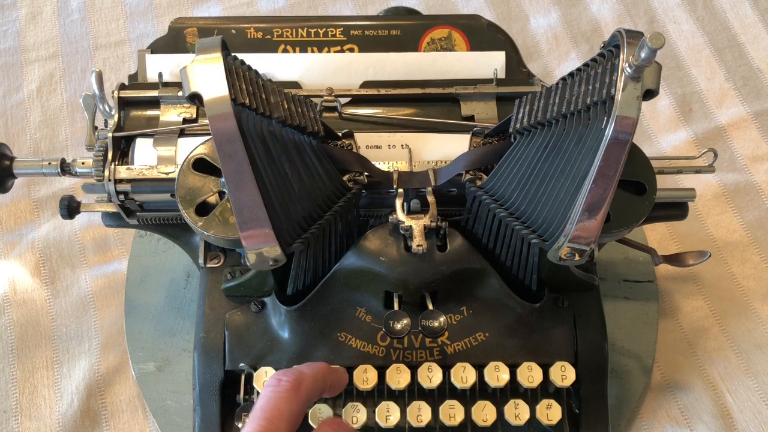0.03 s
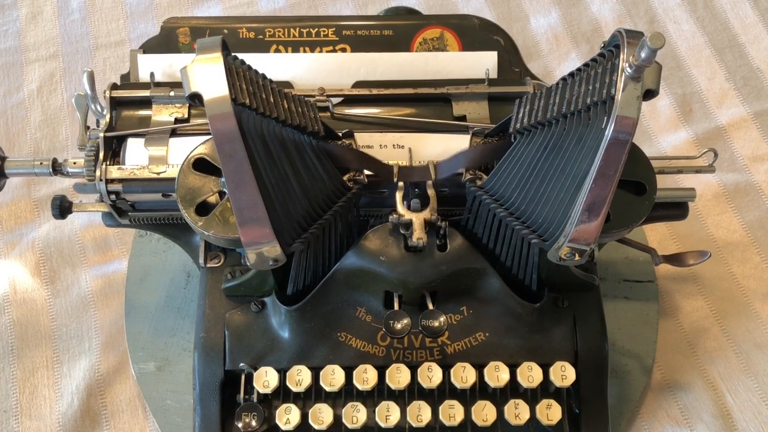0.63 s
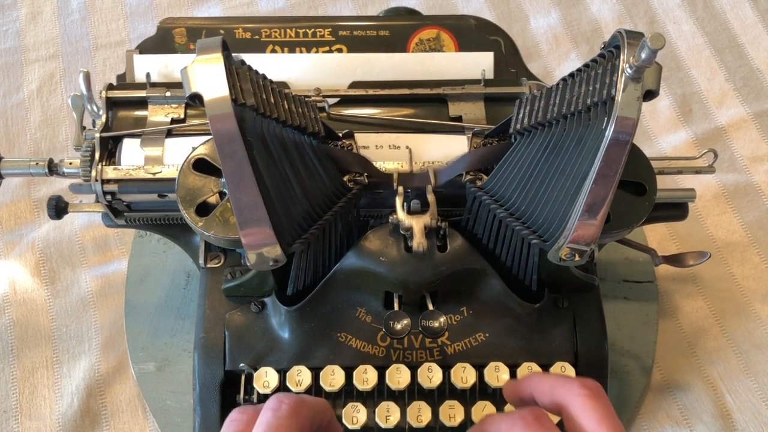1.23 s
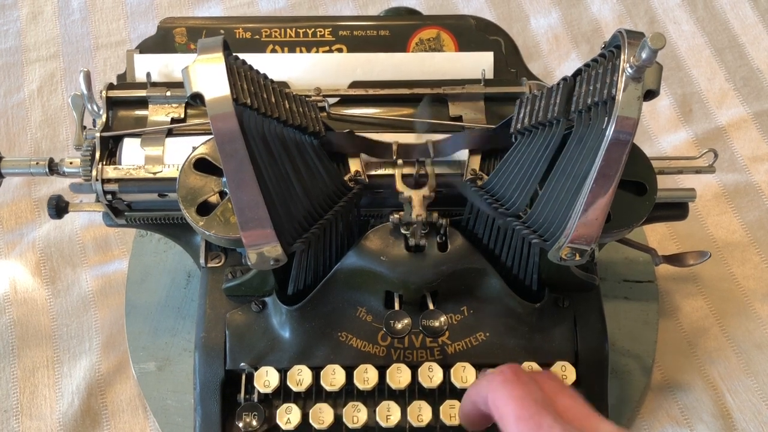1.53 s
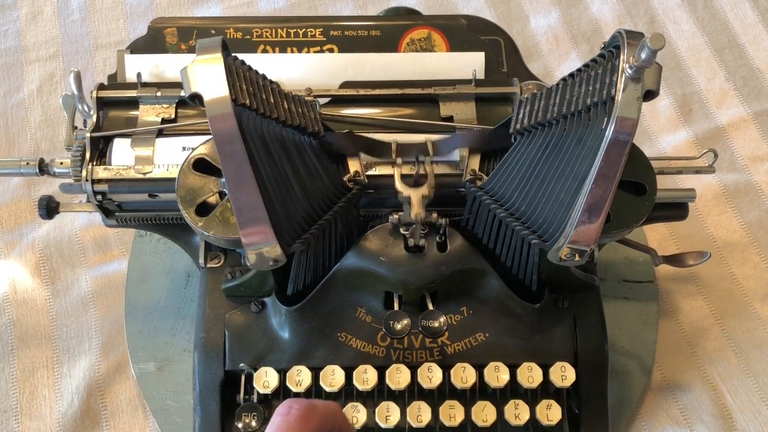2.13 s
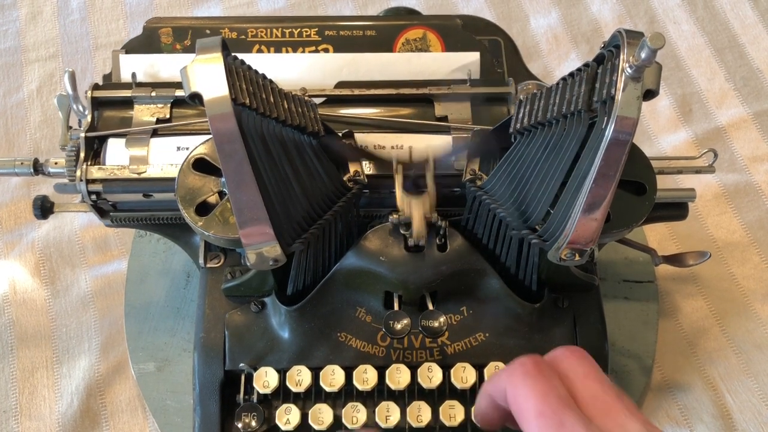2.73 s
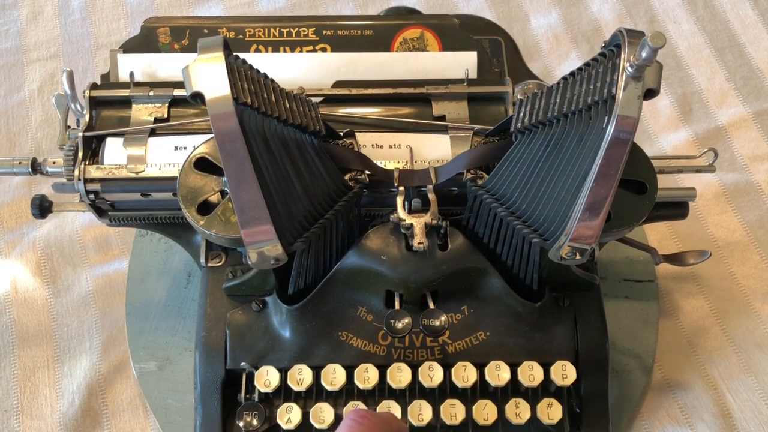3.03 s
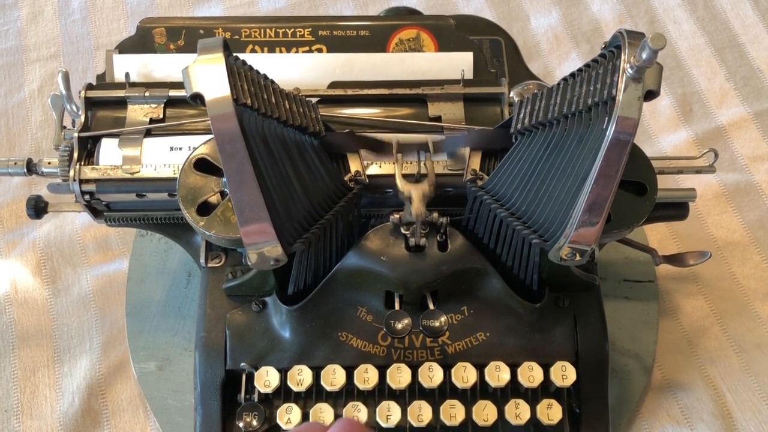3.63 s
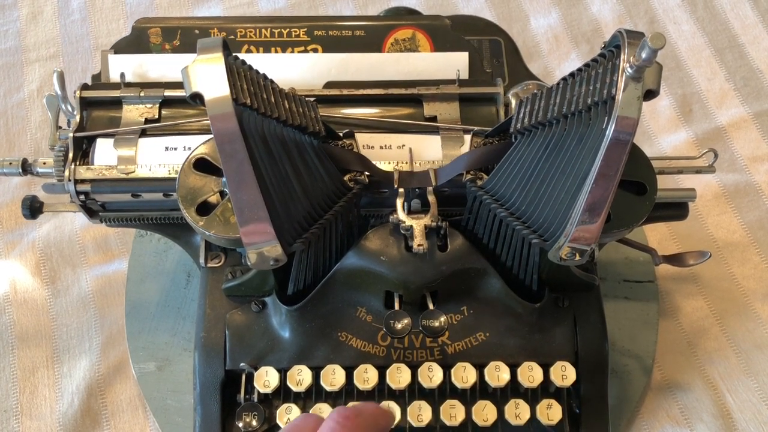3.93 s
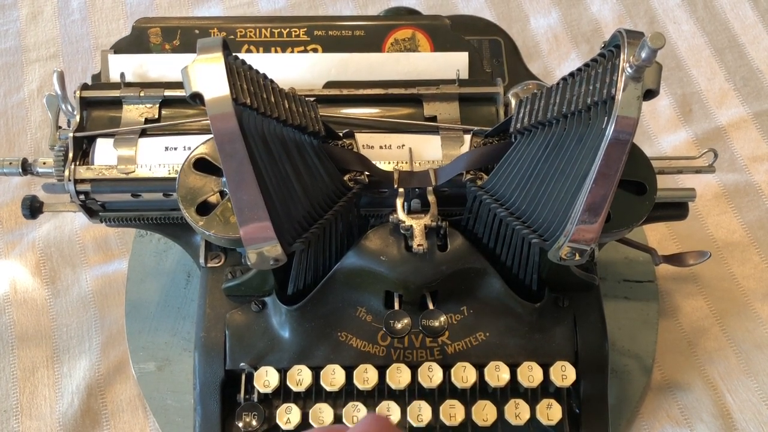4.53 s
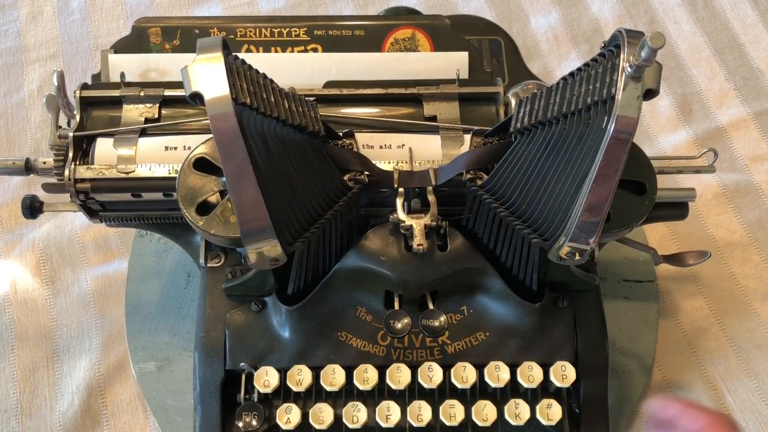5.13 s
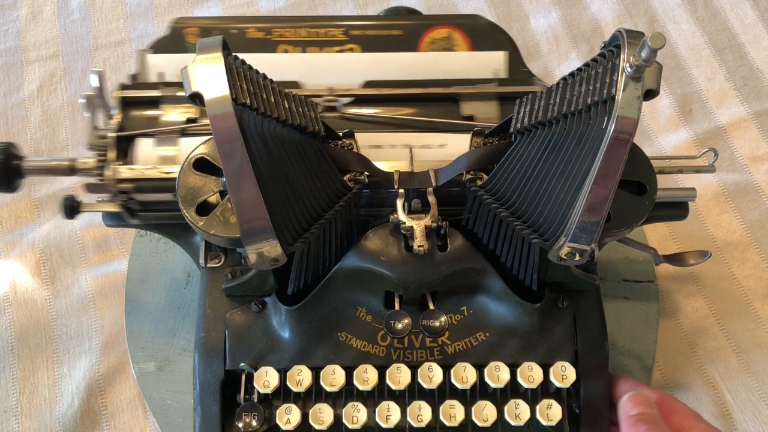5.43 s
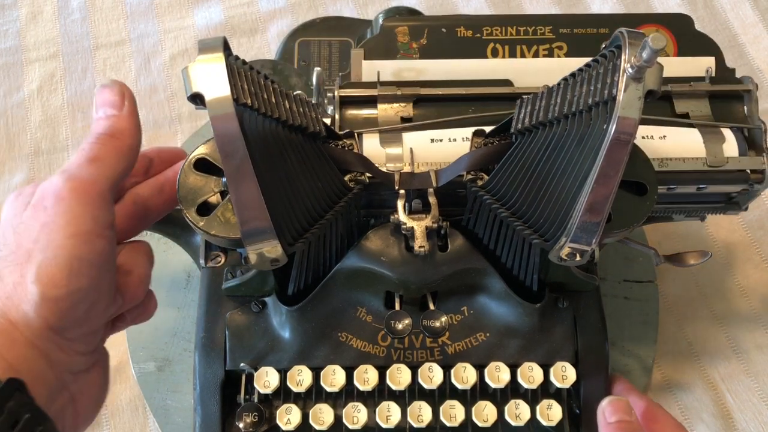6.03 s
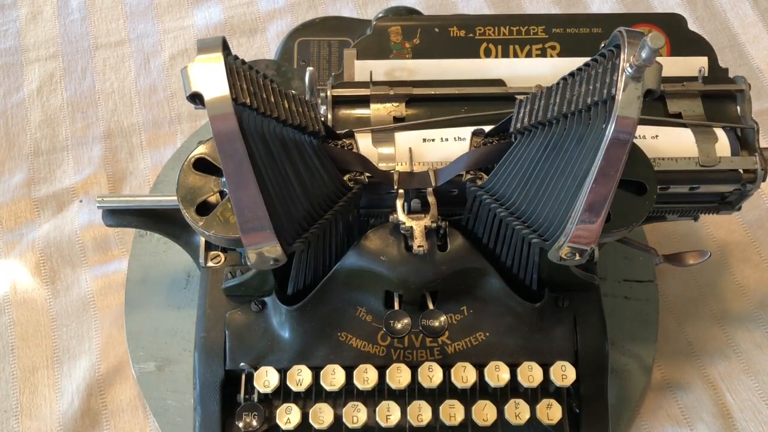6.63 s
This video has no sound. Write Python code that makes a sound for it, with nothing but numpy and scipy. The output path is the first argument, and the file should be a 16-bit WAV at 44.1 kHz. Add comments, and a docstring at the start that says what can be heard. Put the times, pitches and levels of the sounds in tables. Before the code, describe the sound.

Sharp, unhurried key strikes on a manual typewriter in a quiet room, followed by a bell ding and a buzzing carriage return.

```python
"""A quiet room, close to an old manual typewriter on a cloth-covered table.
Six letters and three spaces are typed: levers click, type bars slap the platen, ring and fall back.
The margin bell dings, then the carriage is pushed home over its buzzing ratchet and bumps the stop.
Underneath lie thin hiss, a faint hum and a deep rumble that swells as the table rocks."""
import sys
import numpy as np
from scipy import signal
from scipy.fft import irfft, next_fast_len
from scipy.io import wavfile

SR = 44100
rng = np.random.default_rng(int(sys.argv[2]) if len(sys.argv) > 2 else 0)


def generate_wav(sig):
    """Save sig (samples, or channels by samples) to the path in sys.argv[1] as 16-bit PCM at SR."""
    pcm = np.round(np.clip(np.atleast_2d(sig).T, -1, 1) * 32767).astype(np.int16)
    wavfile.write(sys.argv[1], SR, pcm)


N = 302967
TIME = np.arange(N) / SR

# faint room hum: (frequency [Hz], rms level [dB])
HUM = [(312.2, -74), (468.3, -74), (624.5, -73.5), (893.6, -79.5)]
# room decay: (frequency [Hz], t60 [s])
ROOM_T60 = [(150,0.61),(600,0.35),(2000,0.4),(5000,0.5),(9000,0.12),(15000,0.4)]

# Noise colours, all (frequency [Hz], relative level [dB])
RUMBLE = [(5,12.5),(14,19),(25,2),(45,-8),(80,-19),(150,-30),(400,-68.5),(2000,-110)]   # sub-bass bed
HISS = [(60,-1),(150,0),(400,-7),(800,-11.5),(1600,-20),(4000,-28),(10000,-29),(16000,-46)]   # room air
TABLE_THUMP = [(50,-22.5),(100,0),(150,-4.5),(220,-7.5),(350,-19.5),(1000,-51.5)]   # padded table
ROLLERS = [(80,-40),(250,-4),(500,1),(850,-6.5),(1200,-6),(2500,-14.5),(6000,-11.5),(15000,-19.5)]   # carriage rolling
PAWL_SNAP = [(1000,-12),(3000,-9.5),(5000,-4.5),(7500,0),(10200,4.5),(12500,-3.5),(16000,-32)]   # pawl slipping off a tooth
TICK = [(200,-33.5),(1500,-19),(3000,-10),(5500,2),(8000,0),(10500,-1),(13000,-10.5),(16000,-24.5)]   # bright top of a steel contact
KNOCK = [(150,-35),(600,-16.5),(1300,-3),(2000,1.5),(2800,-3.5),(5000,-22.5),(12000,-46.5)]   # midrange of the linkage
THUD = [(60,-10),(130,-1.5),(250,-20.5),(360,1.5),(520,-4),(650,-9),(820,-1.5),(1100,-15.5),(2000,-22.5),(8000,-59)]   # low body of the frame
SHIMMER = [(300,-20),(800,-8),(2400,-13),(3400,-1.5),(5500,-5.5),(7200,-5.5),(9000,2.5),(10500,-4),(12500,-16),(16000,-31)]   # steely tail of a hit
CRACK = [(200,-8),(800,-3.5),(1500,-9.5),(3000,-4.5),(5500,-4),(8800,6),(10500,3.5),(12500,-11.5),(16000,-26.5)]   # type hitting the platen

# Ringing modes, all (frequency [Hz], relative level [dB], t60 [s])
KEY_TOP_MODES = [(2390,-40,0.011),(2744,-40.5,0.011),(3060,-44.5,0.015)]   # tapped key top
PAWL_MODES = [(7500,-4.5,0.021),(8480,-7.5,0.042),(9830,-6,0.071),(10340,-14,0.024)]   # pawl spring
RAIL_MODES = [(4470,0.5,0.097),(5120,3,0.23),(5370,3,0.089),(5955,-2.5,0.17),(8200,5.5,0.074),(9520,-8,.13),(11600,-5,.12)]   # carriage rails, before the hand damps them
CLANG_MODES = [(5890,-36,0.17),(9448,-50,.2),(9900,-52,0.13)]   # the hammer's short clang on the bell
FRAME_MODES = [(130,-13.5,0.48),(358.7,-6.5,0.1),(420,-20.5,0.095),(515.5,-0.5,0.16),(607,-2,0.083),(690,-4,0.064),(851,-2,0.065),(980,-8.5,.05),(1215,-10.5,0.068)]   # cast frame
PLATEN_MODES = [(746,-1.5,0.09),(803.7,5,0.053),(863,0.5,0.077),(940,-6,0.015)]   # platen roller and its carriage
BAR_MODES = [(3530,-4,.4),(4410,-9,.25),(4670,-9,.25),(5290,-9,.25),(7020,-3,.33),(7125,-4,.3),(7335,-4,.3),(8390,-3,.3),(8487,0,.35),(8620,-1,.3),(8870,0,.32),(9170,1,.32),(9430,-2,.3),(10080,-3,.28),(10740,-6,.25)]   # type bars and springs
# bell partials: (frequency [Hz], relative level [dB], t60 [s], beat [Hz], twin against partial [dB])
BELL_PARTIALS = [(1857,-40,4.6,9,-16),(4791,-38.5,3.9,2.1,-8),(8543,-24,1.4,7.1,-5),(12960,-27,.53,11.2,-6)]

# Cue lists; their levels are relative, and each layer adds its own trim.
# soft bumps through the cloth and table: (time [s], level [dB])
SOFT_BUMPS = [(0.925,-46.5),(2.907,-45.5),(3.965,-46.5),(5.208,-46.5),(6.775,-43)]
# fingers brush the keys, hands take hold: (time [s], tick [dB], knock [dB], thud [dB])
TOUCHES = [(0.889, -61.5, -54, -47), (0.966, -62, -55, -49), (0.988, -55, -51.5, -39.5),
           (5.0578, -74, -38, -38), (5.2003, -64.5, -53.5, -43), (5.282, -54, -42.5, -40.5),
           (6.1127, -56.5, -56, -43.5)]
# carriage speed: (time [s], ratchet rate [teeth/s])
CARRIAGE_SPEED = [(5.342,40),(5.397,50),(5.486,83),(5.6,119),(5.66,131),(5.752,136),(5.831,125),(5.872,107),(5.897,85)]
# the carriage meets its stop and is let go: (time [s], tick [dB], knock [dB], thud [dB])
CARRIAGE_BUMPS = [(5.8407, -28, -35, -53), (5.9025, -30, -35.5, -27), (5.909, -24, -30, -29),
                  (6.1549, -34, -40, -23.5), (6.1889, -38.5, -45.5, -51.5)]
# spaces: (press time [s], travel [s], hold [s], press [dB], rebound [dB])
SPACES = [(0.463, 0.028, 0.14, -3, 3), (2.0948, 0.023, 0.15, 0, -5.5), (3.6001, 0.025, .1385, 1.5, -1.5)]
# letters: (strike time [s], key travel [s], bar hold [s], touch [dB], crack [dB], thud [dB],
# fall-back [dB], fall-back knock [dB])
LETTERS = [(0.1038, .055, 0.12, -3.5, 5, -15, 2, -21), (1.077, 0.035, 0.17, -9, 0.5, -15.5, 3.5, -27.5),
           (1.49, 0.047, .1381, 6.5, 0, -29, -2, -25.5), (1.9171, .05, .1152, 0, 1.5, -14.5, 1, -20.5),
           (2.6269, .073, .1739, -6, -0.5, -19, -0.5, -30.5), (3.3113, 0.042, 0.13, 7.5, 0.5, -15, 1, -22)]

# Balance of each contact: (tick [dB], knock [dB], thud [dB])
LEVER_PULL, ESCAPEMENT, BELL_HAMMER = (-33, -41.5, -26.5), (-44, -45, -35), (-25, -29, -35.5)
SPACE_PRESS, SPACE_BOTTOM, SPACE_RELEASE = (-34, -56, -26), (-27.5, -34.5, -24.5), (-36, -41, -37)
SPACE_REST, SPACE_WOBBLE, SPACE_REBOUND = (-37.5, -34, -20.5), (-39, -38.5, -33), (-38.5, -53, -31.5)

REST_AFTER_S, WOBBLE_AFTER_S, REBOUND_AFTER_S = 0.011, .046, .076   # after the space bar is let go
BELL_AT_S, RETURN_START_S, RETURN_END_S, KEY_TAP_AT_S = 3.824, 5.343, 5.9, 6.758
CUTOFF_HZ = 16000


def from_db(db):
    """Decibels to gain."""
    return 10 ** (np.asarray(db) / 20)


def at_hz(points, hz):
    """Read a curve on a log-frequency axis."""
    f, value = np.transpose(points)
    return np.interp(np.log(np.maximum(hz, 1)), np.log(f), value)


def noise(colour):
    """Steady noise of a given colour, rms 1."""
    size = next_fast_len(N, True)
    hz = np.arange(size // 2 + 1) * SR / size
    real, imaginary = rng.standard_normal((2, len(hz)))
    x = irfft((real + 1j * imaginary) * from_db(at_hz(colour, hz)), size)[:N]
    return x / np.sqrt(np.mean(x ** 2) + 1e-20)


def clicks(times, db):
    """One impulse for each contact."""
    out = np.zeros(N)
    np.add.at(out, np.clip(np.round(times * SR).astype(int), 0, N - 1), from_db(db))
    return out


def fade(hits, t60):
    """Envelope that jumps at each hit and dies away; energies add."""
    return np.sqrt(signal.lfilter([1], [1, -from_db(-120 / (t60 * SR))], hits ** 2 + 1e-18))


def swell(envelope, seconds):
    """Soften the attack: heavy parts take a moment to get moving."""
    r = np.exp(-1 / (seconds * SR))
    return signal.lfilter([1 - r], [1, -r], envelope)


def ring(hits, hz, t60):
    """One resonator: a unit impulse sets a sine of height 1 ringing."""
    r, w = from_db(-60 / (t60 * SR)), 2 * np.pi * hz / SR
    return signal.lfilter([0, np.sin(w)], [1, -2 * r * np.cos(w), r * r], hits + 1e-18)


def ring_modes(modes, hits):
    """Hits drive a bank of resonators of alternating polarity."""
    return sum((-1) ** k * from_db(db) * ring(hits, hz, t60) for k, (hz, db, t60) in enumerate(modes))


def struck(modes, times, db, spread_db, detune):
    """Every blow lands elsewhere, so each mode answers with a strength and pitch slightly its own."""
    hz, level, t60 = np.transpose(modes)[:, :, None]
    t, out = TIME[:int(min(t60.max(), 1) * SR)], np.zeros(N + SR)
    decay = from_db(level - 60 * t / t60)
    variations = rng.standard_normal((len(times), 2, len(modes), 1))
    for s, blow_db, (force, shift) in zip(times, db, variations):
        tones = np.sin(2 * np.pi * hz * (1 + detune * shift) * t)
        rings = from_db(blow_db + spread_db * force) * decay * tones
        start = round(s * SR)
        out[start:start + len(t)] += rings[::2].sum(axis=0) - rings[1::2].sum(axis=0)
    return out[:N]


def chatter(times, db, gap_s, loss_db, count=5):
    """Loose parts bounce a few times after a blow, unevenly, losing strength."""
    luck = rng.random((len(times), 2, count))
    later = times[:, None] + gap_s * np.cumsum(.5 + luck[:, 0], axis=1)
    weaker = db[:, None] - loss_db * (np.arange(count) + 2 * luck[:, 1])
    return clicks(later.ravel(), weaker.ravel())


def contacts(times, db, balance):
    """Cues for one kind of contact: (time [s], tick [dB], knock [dB], thud [dB])."""
    return np.column_stack([times] + [db + part_db + np.zeros(len(times)) for part_db in balance])


def clacks(cues, frame_db, bounce_db, rattle_db, ring_db, tick_t60, thud_t60):
    """Steel parts meet: a bouncing tick, a knock of the linkage, then the frame answers and rattles."""
    s, tick_db, knock_db, thud_db = np.transpose(cues)
    taps = clicks(s, tick_db) + chatter(s, tick_db + bounce_db, gap_s=0.0057, loss_db=2.8)
    tick = noise(TICK) * swell(fade(taps, tick_t60), seconds=.0002)
    shimmer = noise(SHIMMER) * fade(clicks(s, tick_db + ring_db), t60=.24)
    knock = noise(KNOCK) * fade(clicks(s, knock_db), t60=0.046)
    jolts = clicks(s, thud_db) + chatter(s, thud_db + rattle_db, gap_s=0.01, loss_db=1.0, count=4)
    thud = noise(THUD) * swell(fade(jolts, thud_t60), seconds=0.0043)
    frame = struck(FRAME_MODES, s, thud_db + frame_db, spread_db=1.0, detune=0.014)
    return tick + shimmer + knock + thud + frame


def room_tone():
    """The bed: thin hiss and a faint hum."""
    hum = sum(from_db(db) * np.sqrt(2) * np.sin(2 * np.pi * hz * TIME) for hz, db in HUM)
    return from_db(-62) * noise(HISS) + hum


def room_reverb(x, delay_s):
    """Diffuse reflections of a small room, dying octave by octave."""
    t, tail = TIME[:SR * 7 // 10], 0
    edges = np.geomspace(80, 18000, 9)
    for low, high in zip(edges, edges[1:]):
        band_pass = signal.butter(2, [low, high], "band", fs=SR, output="sos")
        band = signal.sosfilt(band_pass, rng.standard_normal(len(t)))
        tail = tail + band * from_db(-60 * t / at_hz(ROOM_T60, np.sqrt(low * high)))
    tail = tail * (t > delay_s)
    return signal.fftconvolve(x, tail / np.sqrt(np.sum(tail ** 2)))[:N]


def table_rumble(rest_db=-38):
    """Every stroke and each end of the carriage's run rocks the table, which slowly settles."""
    grab_s = RETURN_START_S - 0.097   # the hand leans on the carriage before it moves
    pushes = clicks(np.array(LETTERS)[:, 0], -22) + clicks(np.array(SPACES)[:, 0], -23.5)
    pushes += clicks(np.array([grab_s, RETURN_END_S]), -19.5)
    sway = swell(fade(pushes, t60=2.47), seconds=0.045)
    return np.hypot(from_db(rest_db), sway) * noise(RUMBLE)


def table_bumps():
    """The padded table gives dull, slow thumps, also under each falling bar and each space."""
    s, db = np.transpose(SOFT_BUMPS)
    strike, _, held, *_ = np.transpose(LETTERS)
    thumps = clicks(s, db + 8) + clicks(strike + held, -30.5) + clicks(np.array(SPACES)[:, 0], -37.5)
    return noise(TABLE_THUMP) * swell(fade(thumps, t60=0.11), seconds=.008)


def handling():
    """Fingers and hands nudge the machine into faint clacks."""
    return clacks(TOUCHES, frame_db=-14, bounce_db=-7, rattle_db=-9.5, ring_db=3,
                  tick_t60=.03, thud_t60=0.056)


def key_tap():
    """A soft fingertip settles on a key top."""
    fingertip = swell(clicks(np.array([KEY_TAP_AT_S]), 5.3), seconds=.0001)
    return ring_modes(KEY_TOP_MODES, fingertip)


def carriage_return():
    """The pawl snaps over each tooth; with speed the clicks merge to a buzz and the rollers grow loud."""
    s, teeth_per_s = np.transpose(CARRIAGE_SPEED)
    rate = np.interp(TIME, s, teeth_per_s) * (TIME >= RETURN_START_S) * (TIME < RETURN_END_S)
    teeth = np.cumsum(rate) / SR
    times = TIME[np.diff(np.ceil(teeth), prepend=0) > 0]
    snaps = clicks(times, db=rng.standard_normal(N)[:len(times)])
    speed = swell(rate / teeth_per_s.max(), seconds=0.0014)
    pawl = from_db(-28.5) * noise(PAWL_SNAP) * fade(snaps, t60=.014)
    spring = from_db(-32) * ring_modes(PAWL_MODES, snaps)
    frame = from_db(-41) * ring_modes(FRAME_MODES, snaps * speed)
    platen = from_db(-37.5) * ring_modes(PLATEN_MODES, snaps * speed ** 2)
    phase = 2 * np.pi * teeth   # each tooth lifts the pawl against its spring and rocks the carriage
    rocking = from_db(-26.5) * speed ** 2 * sum(np.sin(k * phase) / k ** 2.58 for k in range(1, 4))
    rollers = from_db(-35) * speed ** 1.38 * noise(ROLLERS)
    return pawl + spring + frame + platen + rocking + rollers


def carriage_stop():
    """The carriage lands with a clack; its rails clink and the platen knocks, both damped by the hand."""
    s, tick_db, _, thud_db = np.transpose(CARRIAGE_BUMPS)
    damping = np.array([1, 1, 0.54])   # shortens only the ring time
    clink = struck(RAIL_MODES * damping, s, tick_db - 8, spread_db=0.5, detune=0.0035)
    platen = struck(PLATEN_MODES * damping, s, thud_db + 6.5, spread_db=1.0, detune=0.039)
    clack = clacks(CARRIAGE_BUMPS, frame_db=-3, bounce_db=1.5, rattle_db=-9, ring_db=-8,
                   tick_t60=0.0235, thud_t60=0.095)
    return clink + platen + clack


def margin_bell(gain_db, twin_life=.85):
    """The bell is not quite round: each partial has a weaker, shorter twin that beats with it."""
    hit = clicks(np.array([BELL_AT_S]), gain_db)
    ding = ring_modes(CLANG_MODES, hit)
    for hz, db, t60, beat_hz, twin_db in BELL_PARTIALS:
        twin = from_db(twin_db) * ring(hit, hz + beat_hz, t60 * twin_life)
        ding += from_db(db) * (ring(hit, hz, t60) - twin)
    return ding


def platen_steps():
    """The space bar's press and rebound jog the carriage: the platen gives a short hollow knock."""
    s, _, held, press_db, rebound_db = np.transpose(SPACES)
    times = np.append(s, s + held + REBOUND_AFTER_S)
    db = np.append(press_db - 27, rebound_db - 29.5)
    return struck(PLATEN_MODES, times, db, spread_db=1.5, detune=.03)


def space_bar():
    """The bar bottoms out; let go, it trips the escapement, springs to its rest and rebounds."""
    s, travel, held, press_db, rebound_db = np.transpose(SPACES)
    release = s + held
    cues = np.vstack([contacts(s, press_db, SPACE_PRESS),
                      contacts(s + travel, press_db, SPACE_BOTTOM),
                      contacts(release, 0, SPACE_RELEASE),
                      contacts(release + REST_AFTER_S, 0, SPACE_REST),
                      contacts(release + WOBBLE_AFTER_S, 0, SPACE_WOBBLE),
                      contacts(release + REBOUND_AFTER_S, rebound_db, SPACE_REBOUND),
                      contacts([BELL_AT_S], 0, BELL_HAMMER)])   # cued just after the last space
    return clacks(cues, frame_db=-6, bounce_db=-6.5, rattle_db=-9, ring_db=-10.5,
                  tick_t60=0.026, thud_t60=.07)


def key_levers(usual_travel_s=.048, pull_share=.38):
    """The finger meets the key, the lever pulls the bar and on the way back trips the escapement."""
    s, travel, held, touch_db, *_ = np.transpose(LETTERS)
    thud_db = -33.5 + 20 * np.log10((usual_travel_s / travel) ** 2)   # grows with key speed squared
    touch = np.column_stack([s - travel, touch_db - 32, touch_db - 42, thud_db])
    pull = contacts(s - pull_share * travel, .3 * touch_db, LEVER_PULL)   # once the slack is taken up
    step = contacts(s + held - 0.016, 0, ESCAPEMENT)   # just before the bar is back
    return clacks(np.vstack([touch, pull, step]), frame_db=-13.5, bounce_db=-5.5, rattle_db=-22.5,
                  ring_db=-8.5, tick_t60=0.015, thud_t60=0.079)


def fall_backs():
    """When the key is let go, the type bar drops back on its rest with a rattly clack."""
    s, _, held, *_, fall_db, knock_db = np.transpose(LETTERS)
    cues = np.column_stack([s + held, fall_db - 18.5, knock_db, fall_db - 22])
    return clacks(cues, frame_db=-11.5, bounce_db=-10.5, rattle_db=-5, ring_db=-19,
                  tick_t60=0.022, thud_t60=0.072)


def type_strikes():
    """Type slaps the platen: a hard, bouncing crack, a knock for body and a tail of ringing steel bars."""
    s, _, _, _, crack_db, thud_db, _, _ = np.transpose(LETTERS)
    ring_db = np.full(len(s), -13.5)   # every strike leaves the bars ringing about equally
    blows = clicks(s, crack_db - 1.5) + chatter(s, crack_db - 14, gap_s=0.0054, loss_db=0.5)
    crack = noise(CRACK) * fade(blows, t60=0.035)
    shimmer = noise(SHIMMER) * fade(clicks(s, ring_db), t60=0.25)
    bars = struck(BAR_MODES, s, ring_db - 19.5, spread_db=-0.5, detune=0.00033)
    platen = struck(PLATEN_MODES, s, thud_db - 4, spread_db=-2.5, detune=0.016)
    frame = struck(FRAME_MODES, s, thud_db - 11, spread_db=0, detune=0.016)
    return crack + shimmer + bars + platen + frame


def scene():
    """The mono mix: the machine up front with a little room, the bell dry, the bed underneath."""
    machine = key_levers() + type_strikes() + fall_backs() + space_bar() + platen_steps()
    machine += table_bumps() + carriage_return() + carriage_stop() + key_tap() + handling()
    reflections = from_db(-11.5) * room_reverb(machine, delay_s=0.0045)
    ding = margin_bell(gain_db=-1.13)   # rings far longer than the room does
    return (machine + reflections + ding + table_rumble() + room_tone())[None]


def record(dry):
    """The hardest strikes clip, then a steep low-pass takes off the very top."""
    low_pass = signal.ellip(10, .1, 80, CUTOFF_HZ, fs=SR, output="sos")
    return signal.sosfilt(low_pass, np.clip(dry, -1, 1))


dry = scene()
out = record(dry)
generate_wav(out)
```